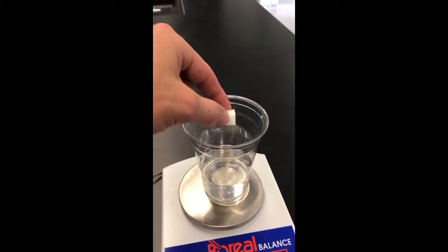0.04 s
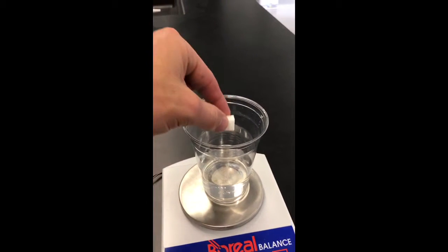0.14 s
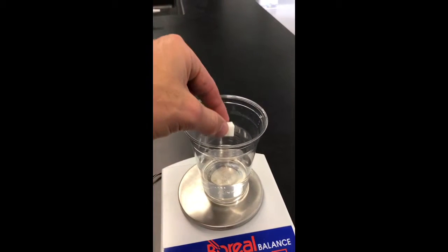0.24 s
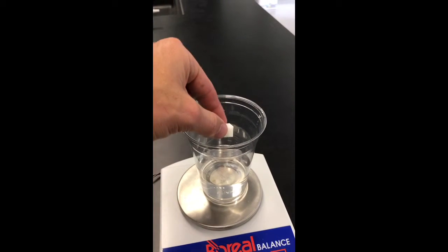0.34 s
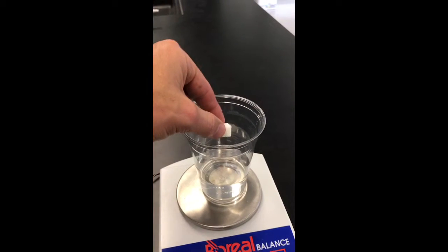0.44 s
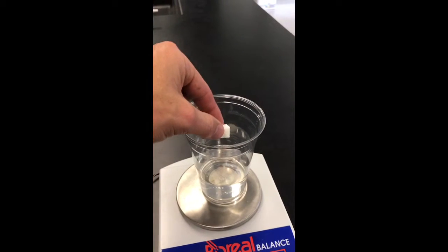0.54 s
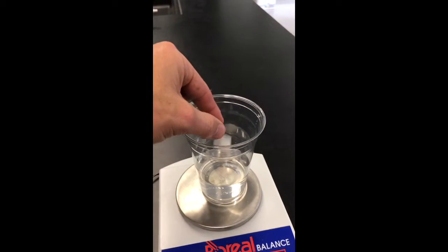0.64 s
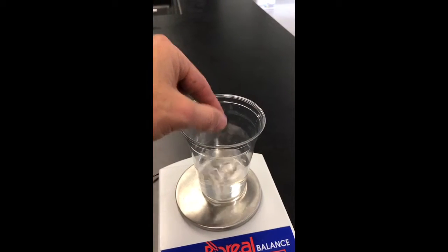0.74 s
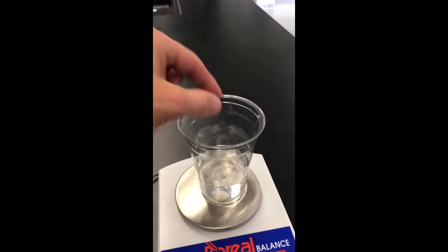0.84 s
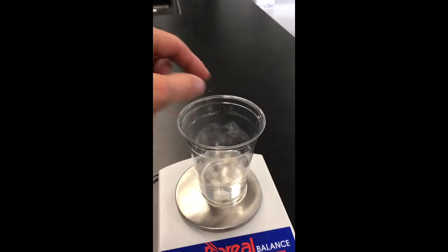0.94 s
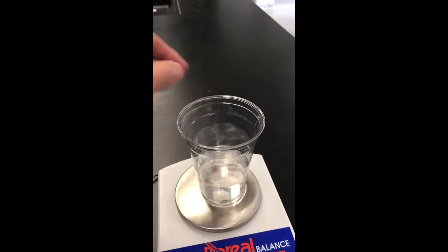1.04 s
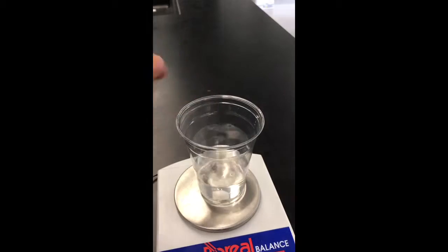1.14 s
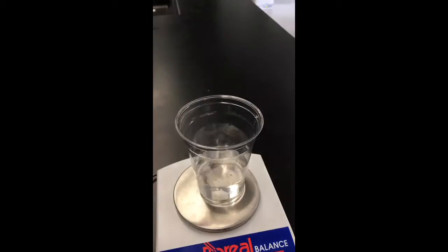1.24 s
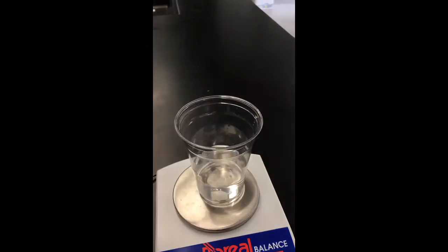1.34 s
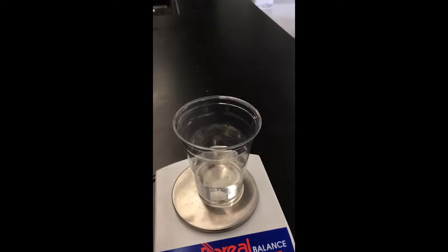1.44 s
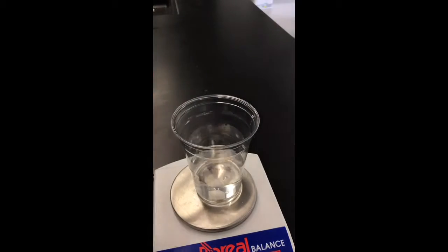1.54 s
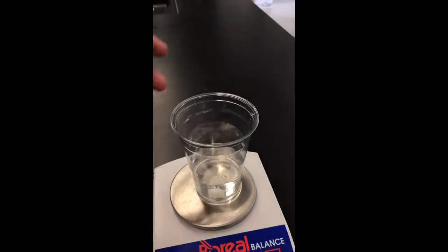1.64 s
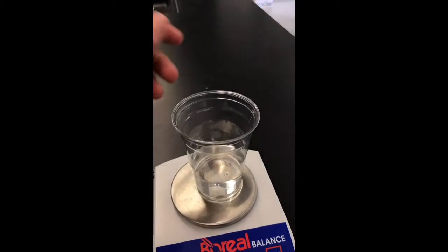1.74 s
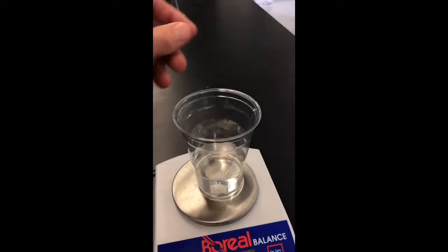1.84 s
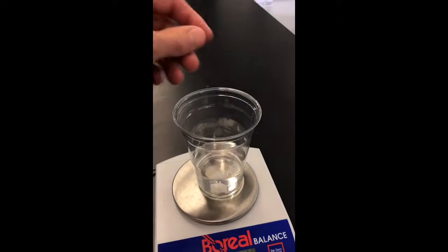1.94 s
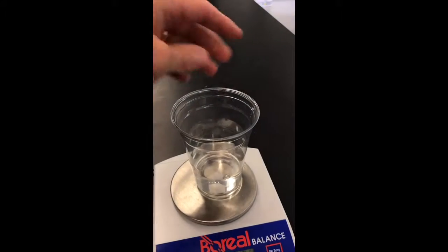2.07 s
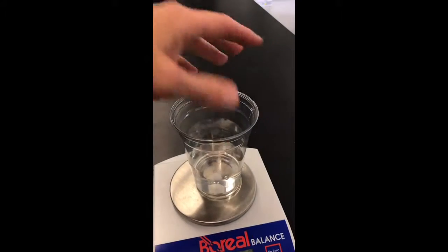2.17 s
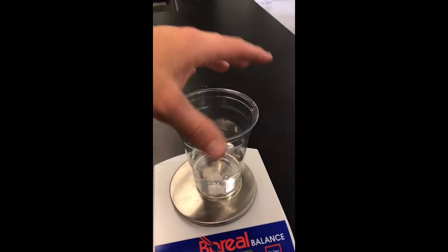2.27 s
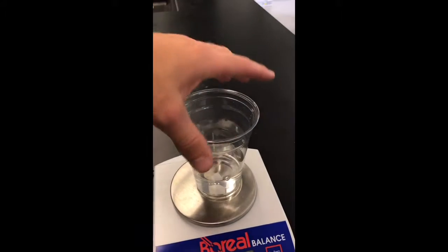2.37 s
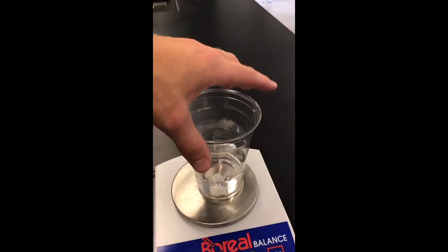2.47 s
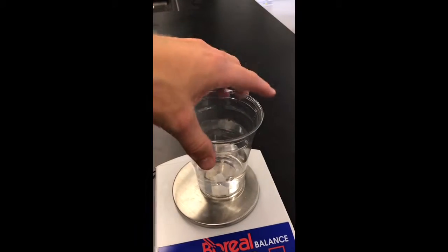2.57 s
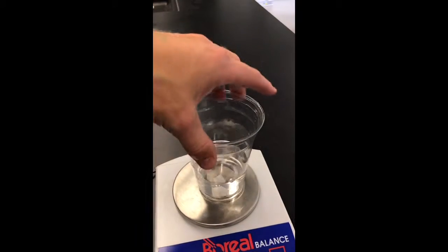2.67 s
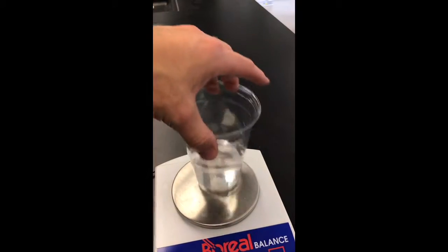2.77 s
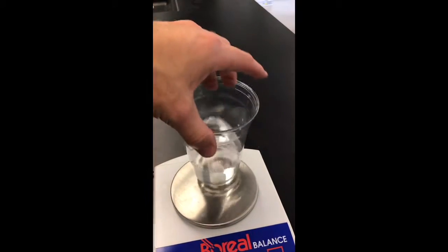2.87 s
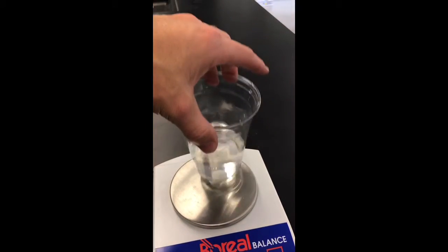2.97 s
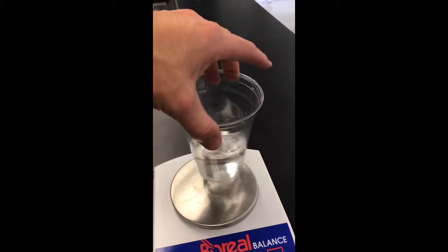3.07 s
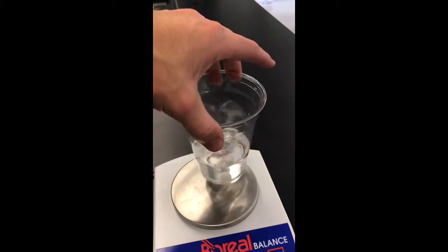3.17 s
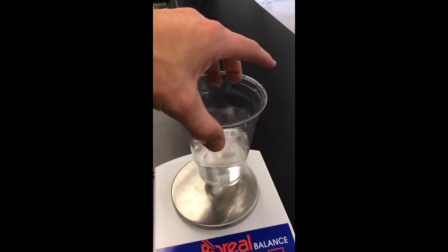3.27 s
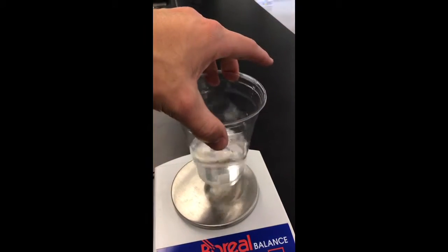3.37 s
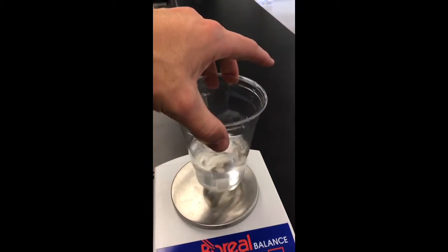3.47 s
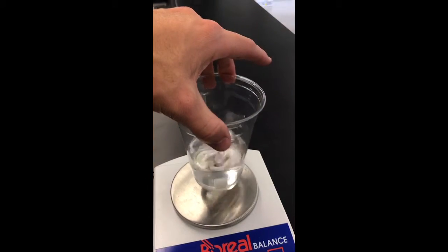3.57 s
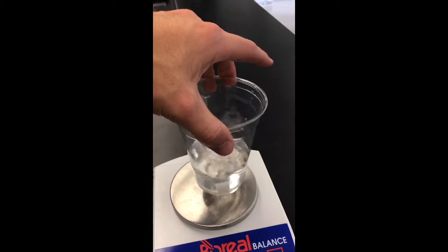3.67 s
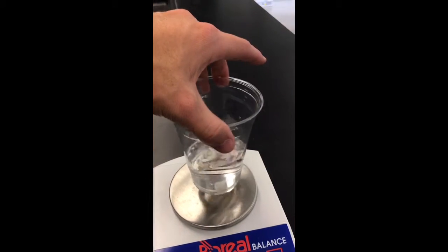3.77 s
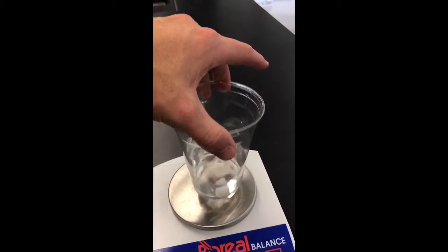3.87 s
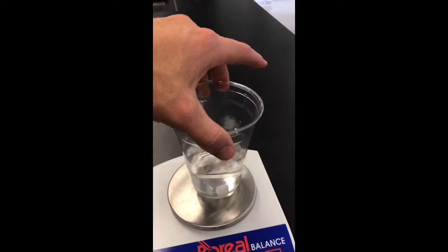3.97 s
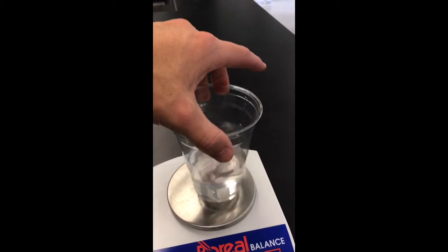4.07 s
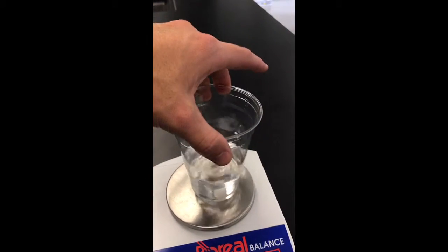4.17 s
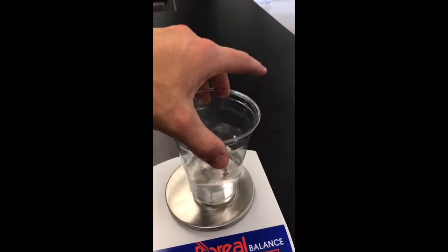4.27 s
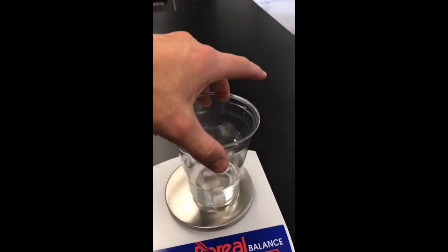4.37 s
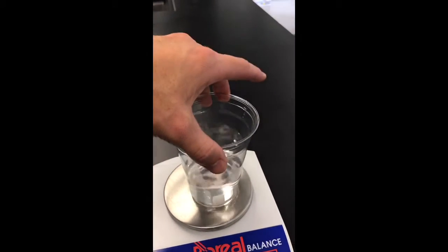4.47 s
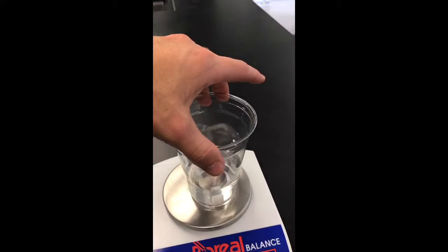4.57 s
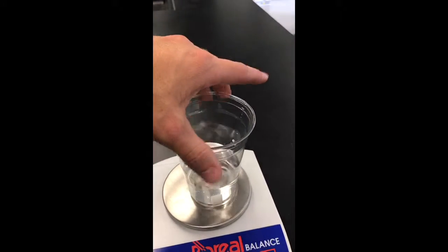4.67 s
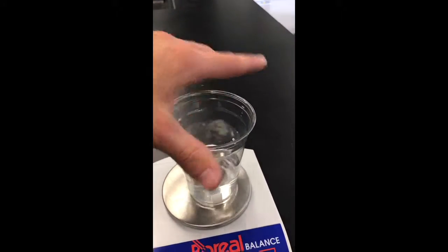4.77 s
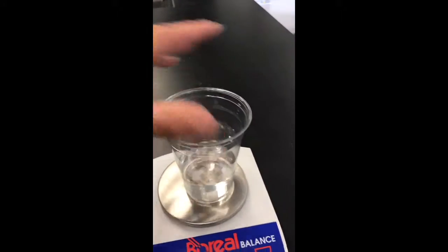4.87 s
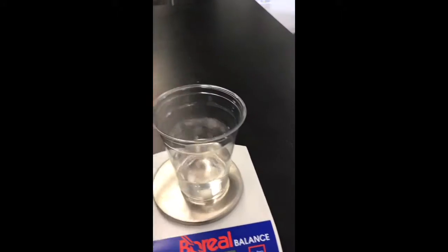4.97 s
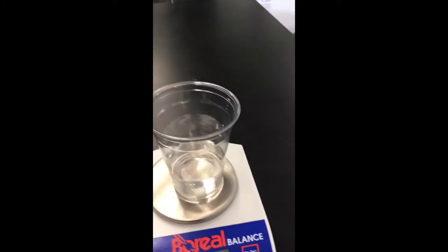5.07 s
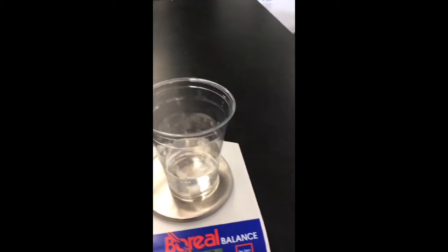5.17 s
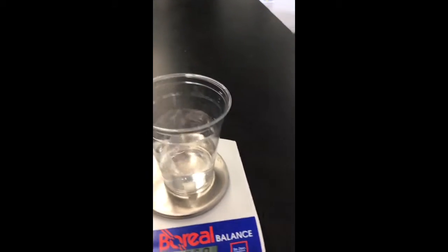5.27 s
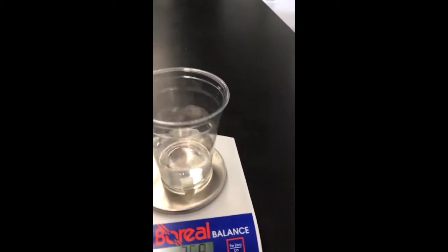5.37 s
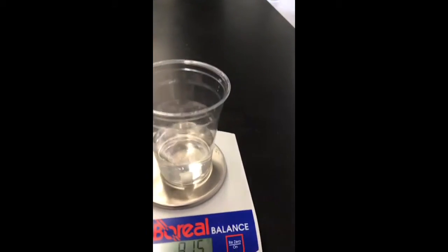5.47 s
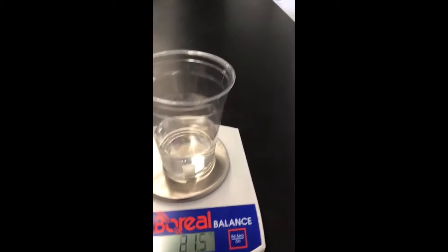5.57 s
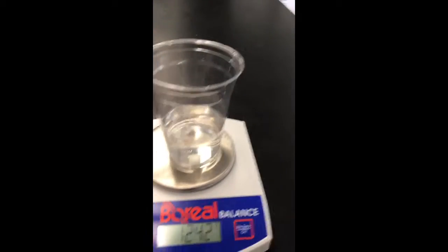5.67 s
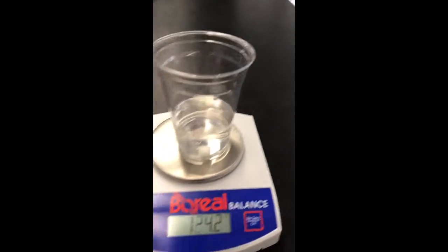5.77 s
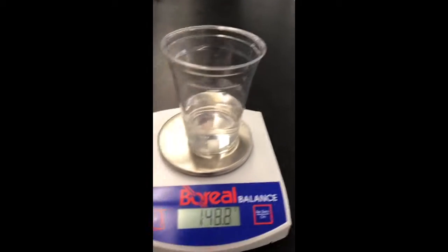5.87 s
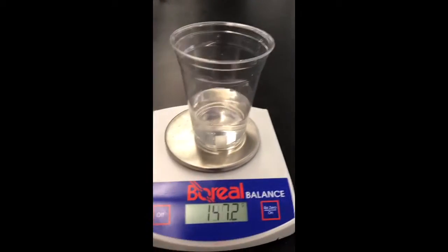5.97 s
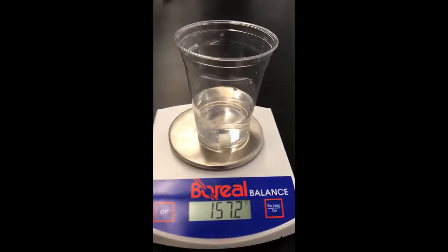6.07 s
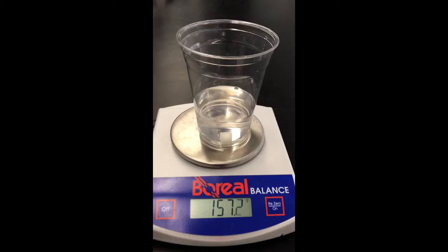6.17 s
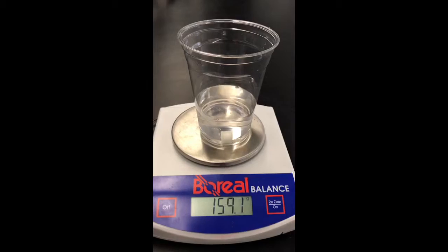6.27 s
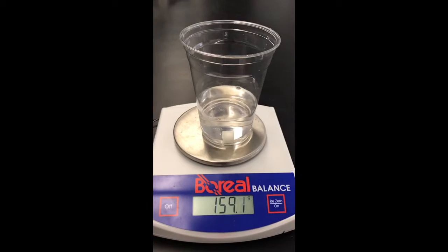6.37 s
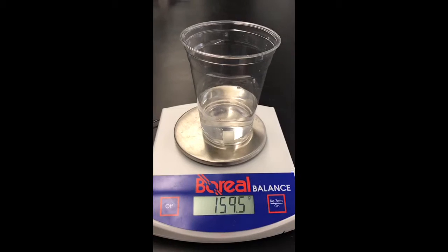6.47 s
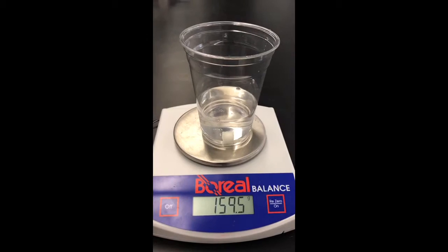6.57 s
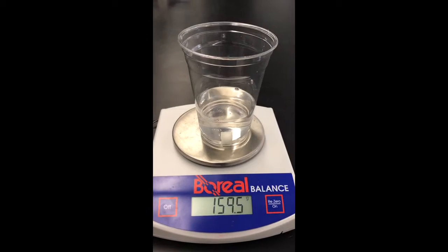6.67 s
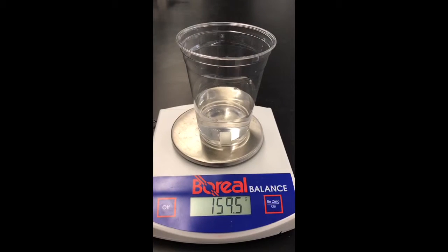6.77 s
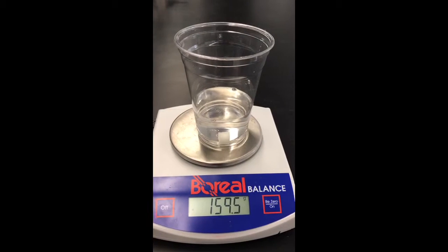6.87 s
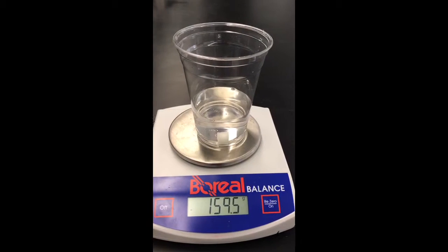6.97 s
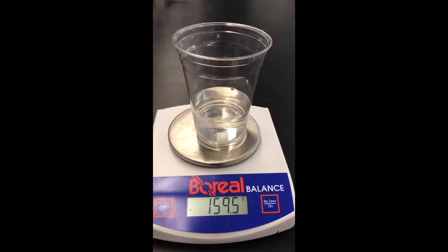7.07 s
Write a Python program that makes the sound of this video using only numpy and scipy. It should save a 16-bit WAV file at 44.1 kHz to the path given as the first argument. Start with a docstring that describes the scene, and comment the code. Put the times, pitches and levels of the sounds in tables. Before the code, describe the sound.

A quiet indoor room holds a steady low ventilation rush with a soft hum, gentle microphone hiss and a barely audible very high whine. At about 0.83 seconds a sugar cube hits water in a thin plastic cup: a tight cluster of bright, hollow clacks within some fifteen milliseconds, joined by tiny gliding bubble notes and a spray rush fading over about a third of a second. A very faint tick follows at 1.0. Barely noticeable hand rustles come near 1.7 and 2.1. Around 2.6 to 2.7 fingers briefly scrape the plastic. From 2.9 to 4.6 swirling gives sparse, irregular, muted knocks, the clearest near 3.53, 4.05 and 4.46. A soft rub at 4.5, another at 4.7 and small bright clicks until 4.8 mark the release. A faint rustle passes at 6.0; otherwise only room noise remains until 7 seconds, its treble dipping briefly near 6.7. Close, mono, slight room tail.

```python
"""A sugar cube drops into a thin plastic cup of water on a metal pan; a hand grips the cup, swirls it so that the
cube knocks about, and lets go. Grainy pushes ring the cup's modes, and sliding fingers drive them with noise.
The drop adds gliding bubble notes and a rush of spray; the hand and sleeve rustle as soft bursts of noise.
Beneath lies a quiet room: ventilation rush with hum, a faint high whine of sines, and microphone hiss of noise."""
import sys
import numpy as np
from scipy import signal
from scipy.fft import rfft, irfft, next_fast_len
from scipy.io import wavfile
from scipy.ndimage import uniform_filter1d, map_coordinates

SR = 44100
rng = np.random.default_rng(int(sys.argv[2]) if len(sys.argv) > 2 else 0)


def boost_factor(decibels):
    """Convert a level in decibels to a linear amplitude factor."""
    exponent = np.asarray(decibels, float) / 20
    return 10 ** exponent


def transcribe(signal):
    """Save signal, clipped to [-1, 1], as a 16-bit WAV file at the path in sys.argv[1]."""
    frames = np.atleast_2d(signal).T
    limited = np.clip(frames, -1, 1)
    pcm = np.round(limited * 32767).astype(np.int16)
    wavfile.write(sys.argv[1], SR, pcm)


N = 314105

# ventilation rush: (frequency [Hz], relative density [dB per Hz])
AIR_SPECTRUM = [(12, -30), (25, -15), (58, 3), (117, 0), (160, -4.5), (198, 3), (227, -6), (295, -10.5),
                (337, -9.5), (455, -12), (689, -14), (985, -14.5), (1800, -21.5), (2340, -56), (3960, -120)]
# fan motor and mains lines: (frequency [Hz], nominal level [dB])
HUM_LINES = [(38, -76), (58.2, -61.5), (70, -69), (103, -67), (120.1, -59), (143, -78), (174.6, -74),
             (232.7, -59.5), (290.9, -61.5), (349.1, -78.5)]
# microphone hiss: (frequency [Hz], relative density [dB per Hz])
HISS_SPECTRUM = [(880, -38), (1500, -14.5), (1880, -2), (2560, -3.5), (4200, -6), (4920, -8), (7030, -8),
                 (7690, -12), (8740, -8.5), (10300, -13), (11200, -11), (14500, -11), (15100, -15),
                 (15500, -9), (15780, -11), (15900, -60)]
# faint high whine: (frequency [Hz], nominal level [dB])
WHINE_LINES = [(15228, -86.5)]
# the hiss's treble dips briefly: (from [s], to [s], change [dB], above [Hz])
TREBLE_DIP = (6.68, 6.75, -11, 3500)

# contacts on the cup: (time [s], air boom [dB], plastic [dB],
# hardness [dB]: + favours the rim, - the body, wall ring over plastic [dB])
TAPS = [(0.8289, -30, -16.5, 2, -12), (0.8315, -37, -20, 0.5, -12), (0.835, -25, -27, -6.5, 4.5),
        (0.839, -38, -27.5, 3.5, 4), (0.8419, -46, -33, -7, -13), (1.01, -47, -50, -9.5, 7.5),
        (2.8875, -45, -56, 9.5, -10), (3.003, -63, -60, 5, 6), (3.085, -48, -53, 1.5, 2),
        (3.239, -44.5, -57, -5, -3), (3.25, -51, -63, 0, 4), (3.526, -37, -40.5, 2.5, 7),
        (3.535, -34.5, -33.5, 1, -3), (3.564, -41.5, -57, -6, -2), (3.582, -46, -57, -2, -3),
        (3.726, -44, -47.5, -1, 0), (3.779, -44, -46.5, 2.5, 7), (3.7975, -46, -50.5, 8, -5),
        (3.92, -50, -58, 0, -6), (3.955, -43.5, -46.5, -3, -2), (3.973, -64, -58, 3, 6),
        (3.992, -38.5, -52.5, -8, 8), (4.0, -39, -63, -2, -6), (4.054, -30, -43.5, -6.5, -1),
        (4.207, -38, -45.5, 1, 10.5), (4.227, -50, -63, 0, 5), (4.262, -41.5, -61, -3, 4),
        (4.455, -41.5, -41, 2.5, 1.5), (4.463, -39.5, -45, -2, -4), (4.571, -45, -49, 1, -11),
        (4.6698, -57, -55, 9, 4.5), (4.7262, -60, -48.5, 14.5, 10), (4.7435, -66, -50, 8, -4),
        (4.764, -48, -42, 14.5, 4.5), (4.797, -50, -51, -4.5, -3)]
# the cup's modes, by family: (frequency [Hz], relative level [dB], t60 [s])
BOOM_MODES = [(677, -9, 0.11), (856, 4.5, 0.039), (1010, -0.5, 0.017)]
BODY_MODES = [(1350, -0.5, 0.013), (1715, 2.5, 0.021), (1906, -4.5, .028), (2080, -11, 0.026)]
WALL_MODES = [(2520, -7.5, 0.039), (2704, 3, 0.019), (2920, -2, 0.017)]
RIM_MODES = [(3500, 2.5, 0.0071), (4120, 0, 0.011), (4550, 1, 0.007), (5240, 0, 0.0078),
             (5640, -6.5, 0.016), (5930, -3.5, 0.006), (7030, -7.5, 0.015), (8370, -7.5, 0.0053),
             (9760, -23, 0.0031), (11600, -2, 0.0021)]
# each body mode while the cup stands free on the pan, over its level in the hand: (change [dB])
FREE_BODY_DB = [1, -4, 5.5, 5.5]

# air pockets dragged under by the drop: (time [s], start [Hz], end [Hz], peak [dB], length [ms])
BUBBLES = [(.8290, 1005, 880, -19.5, 6.1), (.8342, 745, 1090, -22, 6.8), (.8570, 590, 664, -40, 11),
           (.8585, 1010, 915, -40, 8.2)]
# water thrown up by the drop settles: (time [s], rms before the fades [dB], t60 [s])
SPLASH = (.832, -43.5, 0.35)
# colour of that spray: (frequency [Hz], relative density [dB per Hz])
SPRAY_SPECTRUM = [(260, -50), (450, -31), (495, 2), (661, 0), (718, -25), (858, -5), (1390, -11),
                  (1800, -11), (4780, -16), (12000, -37), (15600, -65), (22000, -120)]
# the room's decay: (frequency [Hz], t60 [s])
ROOM_DECAY = [(250, 0.3), (1000, 0.54), (3000, 0.4), (6000, 0.45), (14000, 0.069)]

# soft rustles of the moving hand and sleeve: (time [s], peak level [dB], spread [s], nominal centre [Hz])
RUSTLES = [(1.71, -67, .008, 11000), (2.068, -68, .015, 9000), (6.034, -62.5, 0.032, 3500)]
# fingers sliding on the cup: (time [s], length [s], level [dB], swell over the stroke [dB], grip [dB])
RUBS = [(2.604, 0.019, -51, 2.5, -0.5), (2.682, 0.031, -61, 10, -1), (4.506, 0.07, -51, 0.5, 6),
        (4.7, 0.033, -58, -2, -5)]
# how strongly a sliding finger wakes boom, body, wall and rim: (level [dB])
RUB_FAMILY_DB = [-22, -17, -0.5, -9.5]
# thin rings and airy skin hiss that only sliding wakes: (frequency [Hz], relative level [dB], t60 [s])
RUB_MODES = [(4500, -15, .02), (5550, -10.5, 0.025), (9000, -5, .001)]


def unit(x):
    """Scales a sound to rms 1."""
    return x / np.sqrt(np.mean(x ** 2) + 1e-20)


def along(points, hz):
    """Reads (frequency, value) points on a log frequency axis."""
    f, v = np.transpose(points)
    return np.interp(np.log(hz + 1), np.log(f + 1), v)


def wobble(rate):
    """A smooth random curve with rate knots a second."""
    knots = rng.standard_normal(int(N * rate / SR) + 4)
    return map_coordinates(knots, [np.arange(N) * rate / SR])


def noise(spectrum):
    """Random noise of rms 1, coloured by a spectrum."""
    m = next_fast_len(N + 8192)
    gain = boost_factor(along(spectrum, np.fft.rfftfreq(m, 1 / SR)))
    white = rng.standard_normal(m)
    return unit(irfft(rfft(white) * gain, m)[:N])


def tones(lines, waver_db, rate, drift):
    """Steady sines whose level [dB] and phase [rad] waver slightly, at rate knots a second."""
    t = np.arange(N) / SR
    out = np.zeros(N)
    for hz, db in lines:
        level = boost_factor(db + 3.5 + waver_db * wobble(rate))  # a sine's peak lies 3 dB over its rms
        phase = drift * wobble(rate) + 6 * rng.random()
        out += level * np.sin(2 * np.pi * hz * t + phase)
    return out


def ventilation():
    """Rushing air as slowly wavering low noise, with its hum as a set of nearly steady sines."""
    air = noise(AIR_SPECTRUM)
    band = signal.butter(4, [380, 1500], "bandpass", fs=SR, output="sos")
    middle = signal.sosfilt(band, air)
    level = boost_factor(-63.5 + 0.34 * wobble(1.34))  # sets the rms of the middle band
    return air * level / np.std(middle) + tones(HUM_LINES, 1.02, 2.48, 0.14)


def hiss_and_whine():
    """Microphone hiss as slightly wavering noise and a wavering high sine; their treble dips briefly."""
    hiss = boost_factor(-66 + 0.25 * wobble(1.9)) * noise(HISS_SPECTRUM)
    bed = hiss + tones(WHINE_LINES, 4.9, 6, 1.2)
    start, end, dip_db, above_hz = TREBLE_DIP
    low = signal.sosfiltfilt(signal.butter(2, above_hz, fs=SR, output="sos"), bed)
    treble = bed - low
    t = np.arange(N) / SR
    inside = 1.0 * ((t > start) & (t < end))
    dip = uniform_filter1d(inside, size=300) * dip_db
    return bed - treble * (1 - boost_factor(dip))


def ring(modes, scatter_db, detune):
    """One blow's decaying modes; grip and water level shift strength and pitch a little each time."""
    t = np.arange(SR // 10) / SR
    out = np.zeros(len(t))
    for hz, db, t60 in modes:
        strength, pitch = rng.standard_normal(2)
        decay = boost_factor(db + scatter_db * strength - 60 * t / t60)
        out += decay * np.sin(2 * np.pi * hz * (1 + detune * pitch) * t)
    return out


def contact_force(hard_db):
    """A rough push on the cup, shorter the harder it is; crumbly sugar makes it grainy."""
    t = np.arange(SR // 50) / SR
    push_ms = 0.96 * boost_factor(-0.4 * hard_db)  # time at which the push peaks
    u = 1000 * t / push_ms
    grain = rfft(u * np.exp(-u) * rng.standard_normal(len(t)))
    flat = grain / np.abs(grain) ** 0.98  # nearly level spectrum: it favours no pitch
    return irfft(flat, len(t)) * np.exp(-u / 6)


def taps():
    """Each contact's push rings the cup's families; a harder one is brighter, with less body and more rim."""
    out = np.zeros(N + SR)
    grip_s = 2.5  # the hand takes the cup
    for s, boom_db, plastic_db, hard_db, wall_db in TAPS:
        force = contact_force(hard_db)
        body = [(hz, level + (s < grip_s) * free_db, t60)
                for (hz, level, t60), free_db in zip(BODY_MODES, FREE_BODY_DB)]
        families = ((boom_db, BOOM_MODES, 0.03),
                    (plastic_db - 1.1 * hard_db, body, 0.015),
                    (plastic_db + wall_db, WALL_MODES, 0.015),
                    (plastic_db + hard_db, RIM_MODES, 0.05))
        for db, modes, detune in families:
            hit = np.convolve(force, ring(modes, 0.37, detune))
            out[round(s * SR):][:len(hit)] += boost_factor(db) * hit / np.abs(hit).max()
    return out[:N]


def radiated(x, low_hz, high_hz):
    """A small cup sends out no bass and little of the highest treble."""
    return signal.sosfilt(signal.butter(3, [low_hz, high_hz], "bandpass", fs=SR, output="sos"), x)


def bubbles():
    """Each air pocket sings a short gliding note as it changes size and depth."""
    out = np.zeros(N)
    for s, from_hz, to_hz, db, ms in BUBBLES:
        u = np.linspace(0, 1, round(ms * SR / 1000))
        phase = 2 * np.pi * np.cumsum(from_hz + (to_hz - from_hz) * u) / SR
        swell = np.sin(np.pi * u ** 0.5)  # rises faster than it falls
        out[round(s * SR):][:len(u)] += boost_factor(db) * swell * np.sin(phase)
    return out


def splash():
    """Droplets and fizz: a lumpy rush of noise dying away after the drop."""
    s, db, t60 = SPLASH
    t = np.maximum(np.arange(N) / SR - s, 0)
    onset = 1 - np.exp(-t / 0.0071)
    return noise(SPRAY_SPECTRUM) * boost_factor(db + 1.3 * wobble(60.3) - 60 * t / t60) * onset


def room(x):
    """Each third of a second gets its own noise tail, every frequency dying at its own speed."""
    out, step = np.zeros(N + 2 * SR), SR // 3
    for start in range(0, N, step):
        hz, t, z = signal.stft(rng.standard_normal(SR // 2), SR, nperseg=256)
        decay = boost_factor(-60 * t / along(ROOM_DECAY, hz)[:, None])
        tail = signal.istft(z * decay, SR, nperseg=256)[1]
        wet = signal.fftconvolve(x[start:start + step], tail / np.linalg.norm(tail))
        out[start + 300:][:len(wet)] += wet  # the tail follows 300 samples later
    return out[:N]


def rustles():
    """Hand and sleeve: brief bell-shaped swells of cloth noise, about two octaves wide."""
    t = np.arange(N) / SR
    out = np.zeros(N)
    for s, db, spread, hz in RUSTLES:
        cloth = noise([(hz / 4, -25), (hz / 2, 0), (hz * 1.2, 0), (hz * 3, -25)])
        out += boost_factor(db) * np.exp(-0.5 * ((t - s) / spread) ** 2) * cloth
    return out


def rubs():
    """Skin slips in dense uneven grains that drive the cup's modes; a tight grip damps the middle wall mode."""
    out, t = np.zeros(N), np.arange(N) / SR
    attack_s, release_s, edge_db = 0.011, 0.011, -26  # fades outside the stroke, and how far down they reach
    for s, length, db, swell_db, grip_db in RUBS:
        wall = [(hz, level + share * grip_db, t60)
                for (hz, level, t60), share in zip(WALL_MODES, (0.5, -1, 0.5))]
        cup = ring(RUB_MODES, 0, 0)
        for level, family in zip(RUB_FAMILY_DB, (BOOM_MODES, BODY_MODES, wall, RIM_MODES)):
            cup += boost_factor(level) * ring(family, 0, 0)
        unevenness = boost_factor(1.5 * wobble(400) + 0.8 * wobble(90))
        grains = unit(rng.standard_normal(N) * unevenness)
        times = [s - attack_s, s, s + length, s + length + release_s]
        levels = [db + edge_db, db, db + swell_db, db + swell_db + edge_db]
        stroke = boost_factor(np.interp(t, times, levels, left=-120, right=-120))
        out += signal.fftconvolve(grains * stroke, cup / np.linalg.norm(cup))[:N]
    return out


def scene():
    """Cup and bubbles with their room tail, then splash and rustles, over the quiet background."""
    background = ventilation() + hiss_and_whine()
    cup = radiated(taps() + rubs(), low_hz=653, high_hz=11900) + bubbles()
    mix = cup + boost_factor(-22) * room(cup) + splash() + rustles() + background
    return mix[None]  # one channel


def band_limit(x):
    """A steep low-pass at the top of the band."""
    return signal.sosfilt(signal.butter(12, 16430, fs=SR, output="sos"), x)


def record(dry):
    """Takes the finished mix, at its own level, to the final sound."""
    return band_limit(dry)


dry = scene()
out = record(dry)
transcribe(out)
```